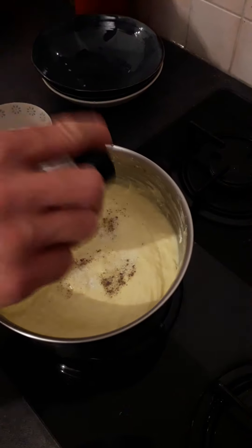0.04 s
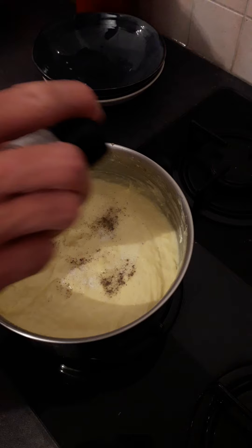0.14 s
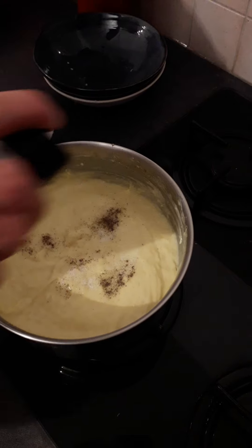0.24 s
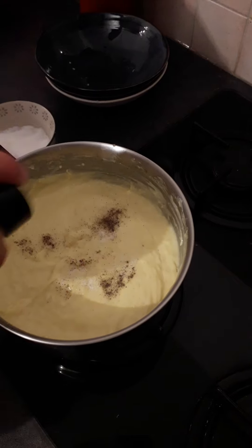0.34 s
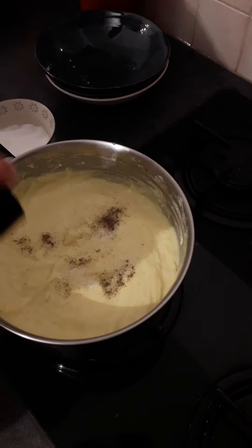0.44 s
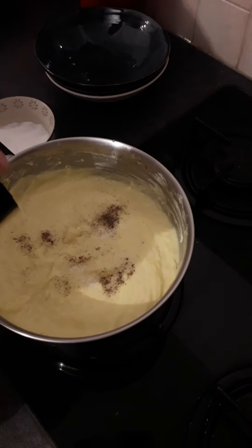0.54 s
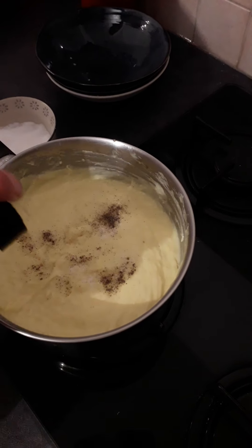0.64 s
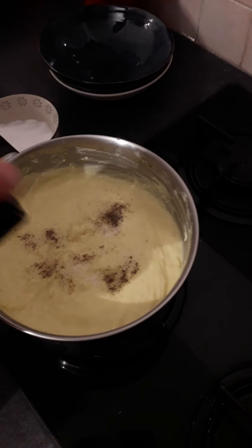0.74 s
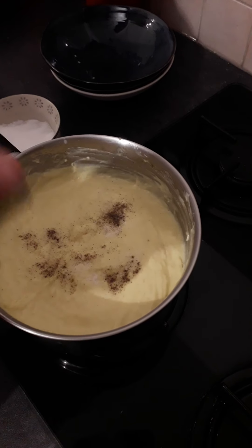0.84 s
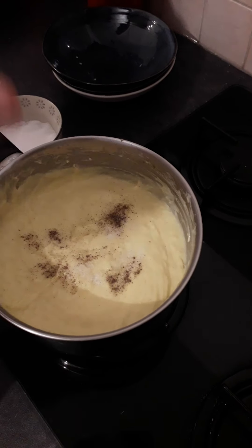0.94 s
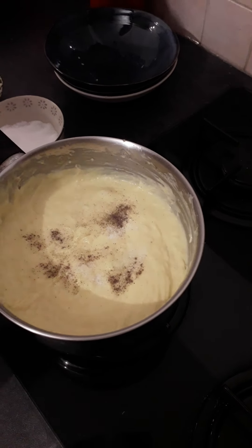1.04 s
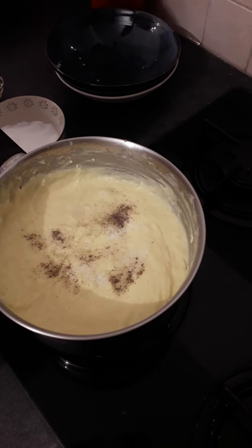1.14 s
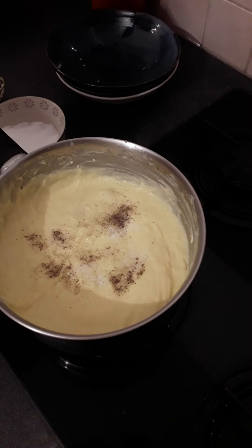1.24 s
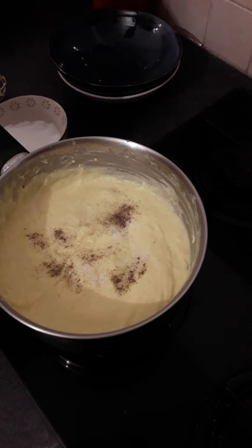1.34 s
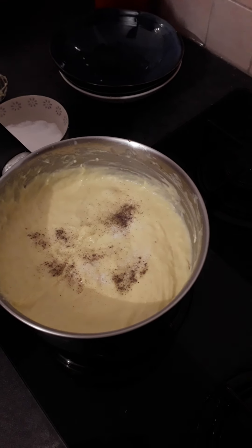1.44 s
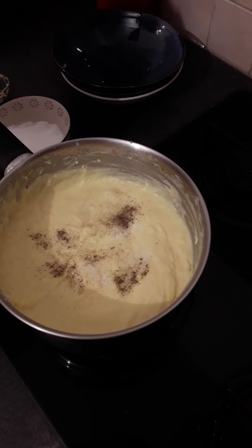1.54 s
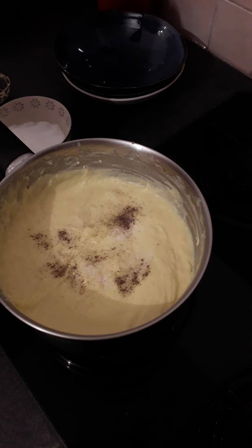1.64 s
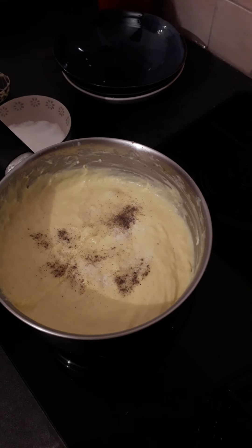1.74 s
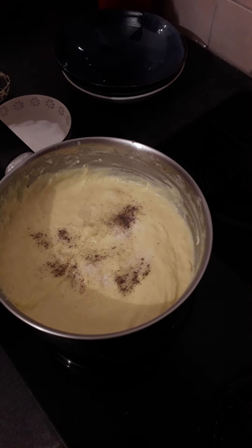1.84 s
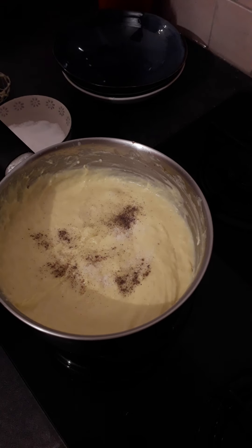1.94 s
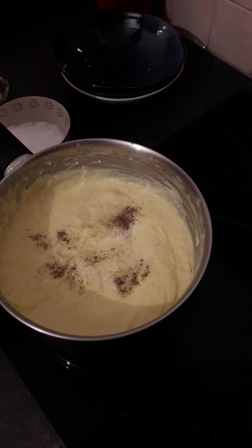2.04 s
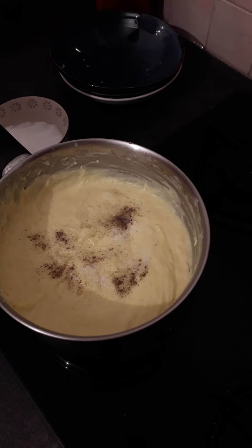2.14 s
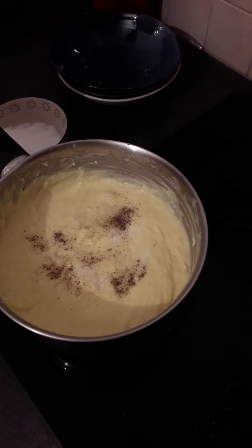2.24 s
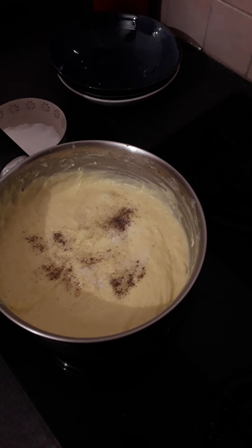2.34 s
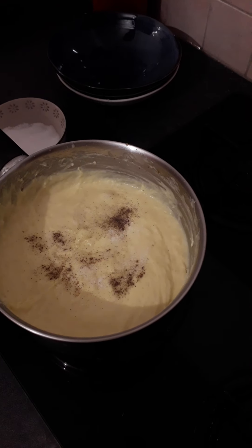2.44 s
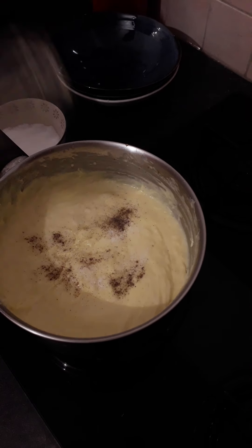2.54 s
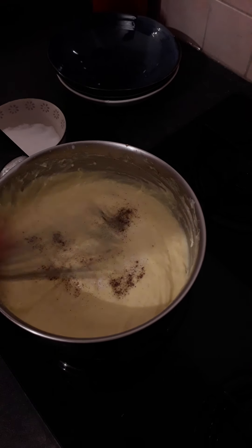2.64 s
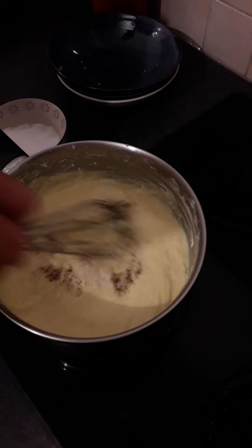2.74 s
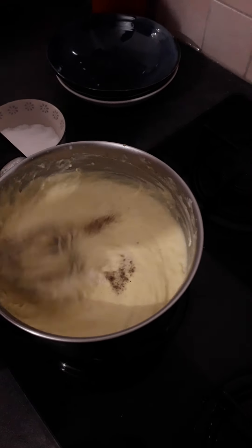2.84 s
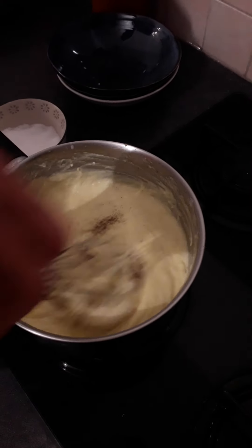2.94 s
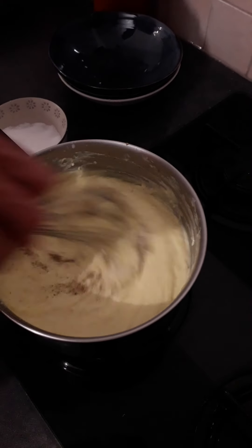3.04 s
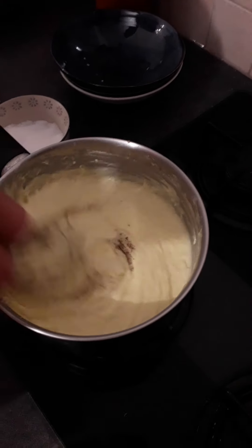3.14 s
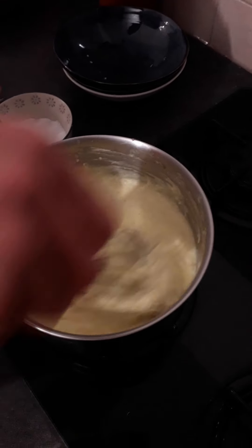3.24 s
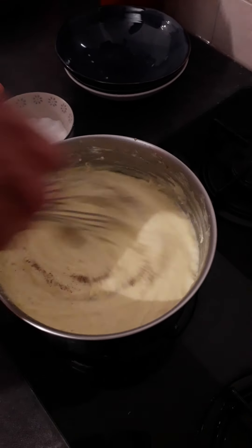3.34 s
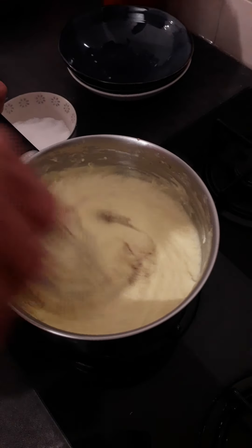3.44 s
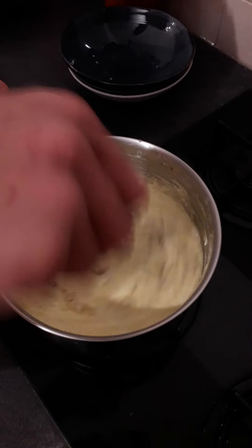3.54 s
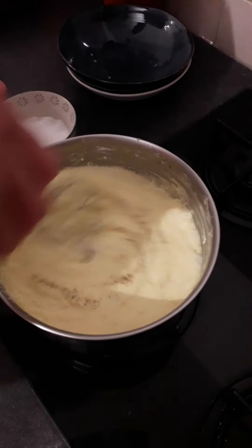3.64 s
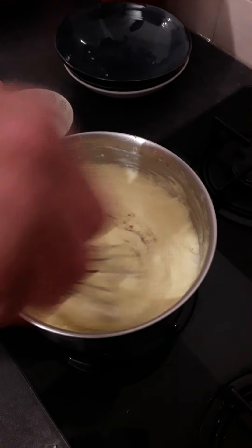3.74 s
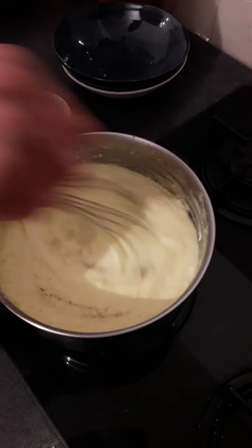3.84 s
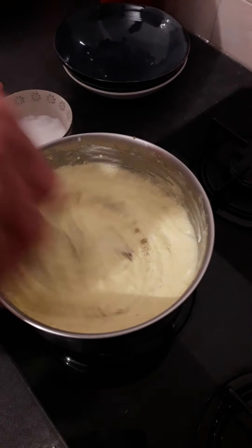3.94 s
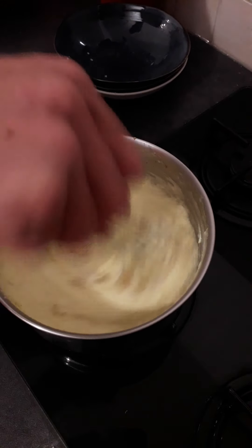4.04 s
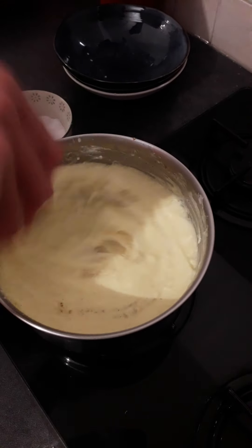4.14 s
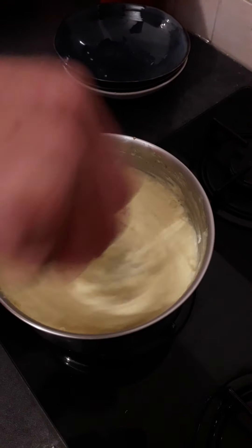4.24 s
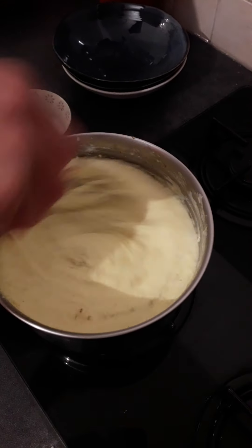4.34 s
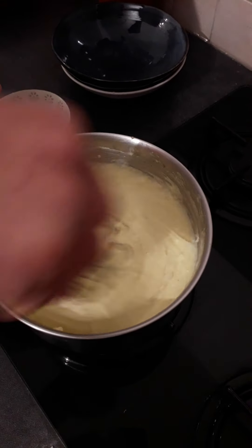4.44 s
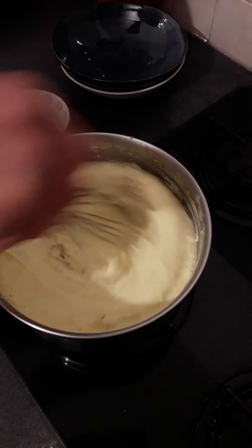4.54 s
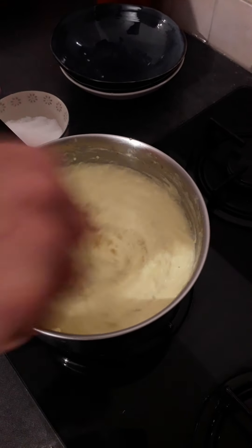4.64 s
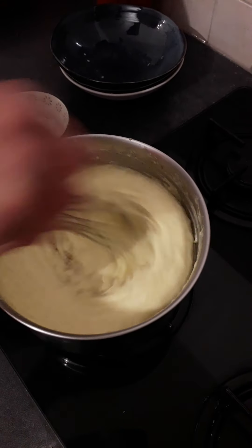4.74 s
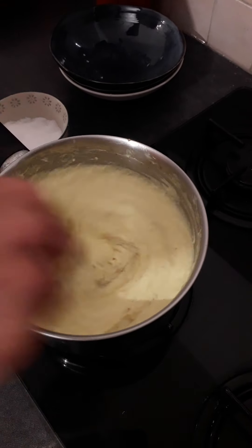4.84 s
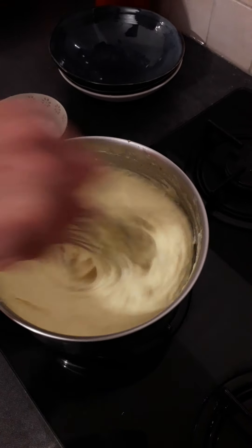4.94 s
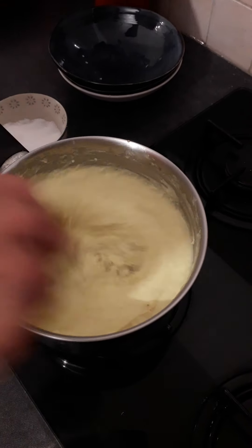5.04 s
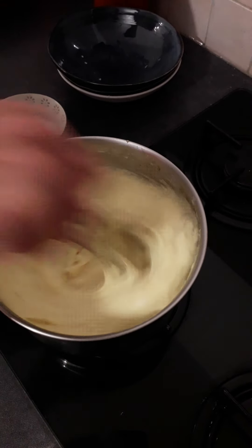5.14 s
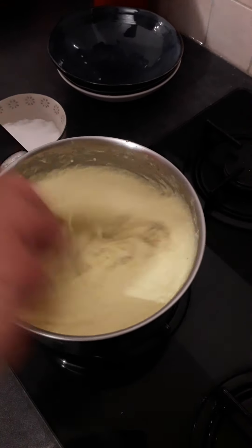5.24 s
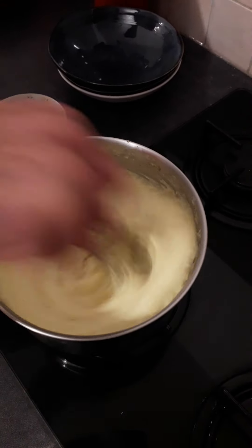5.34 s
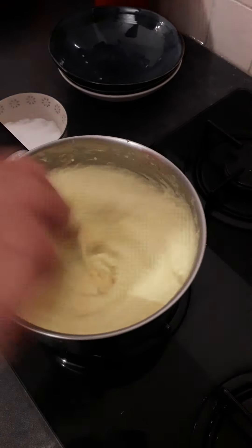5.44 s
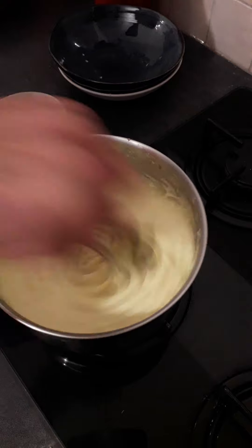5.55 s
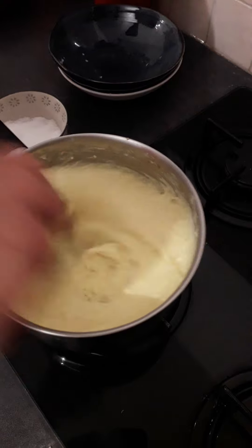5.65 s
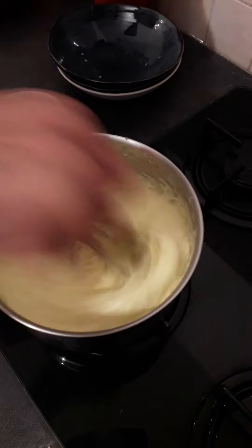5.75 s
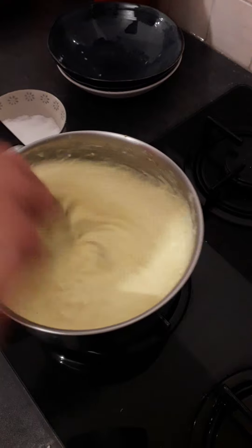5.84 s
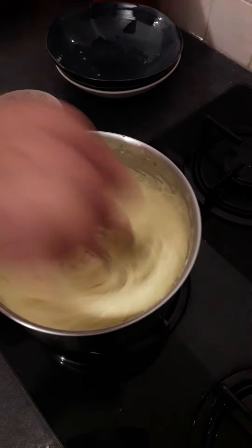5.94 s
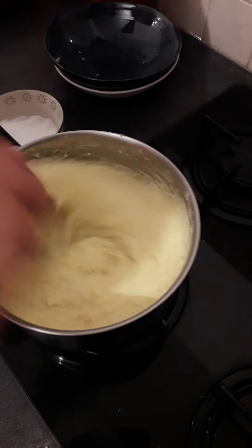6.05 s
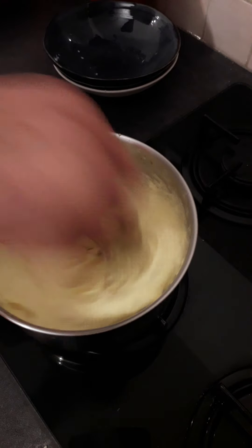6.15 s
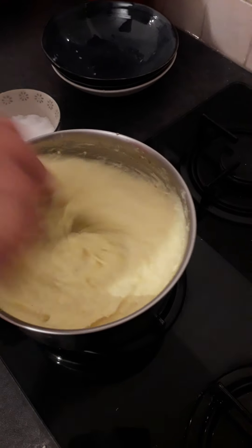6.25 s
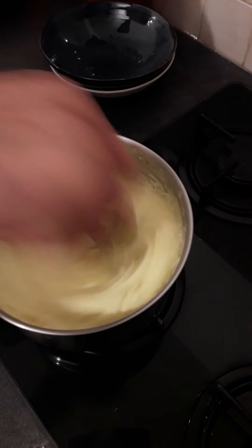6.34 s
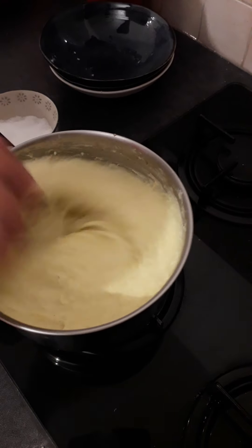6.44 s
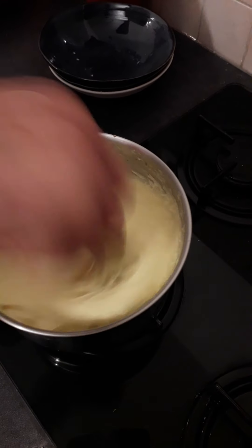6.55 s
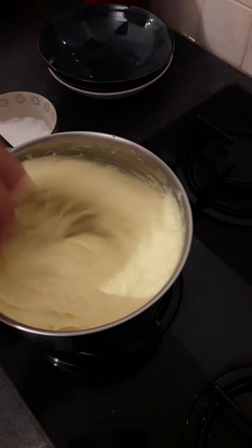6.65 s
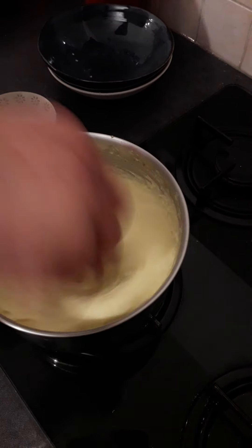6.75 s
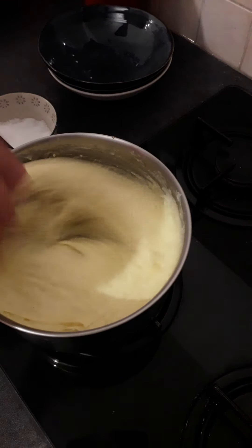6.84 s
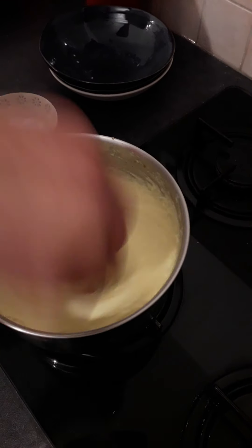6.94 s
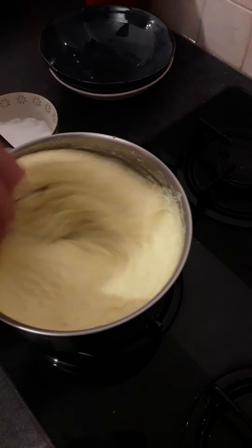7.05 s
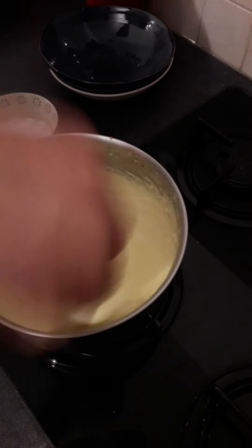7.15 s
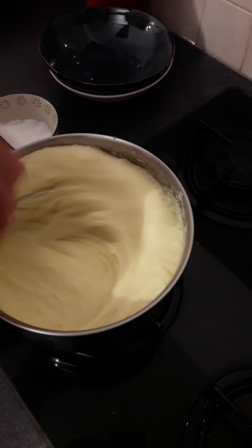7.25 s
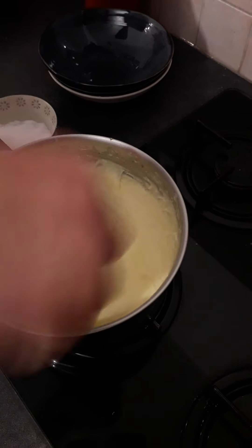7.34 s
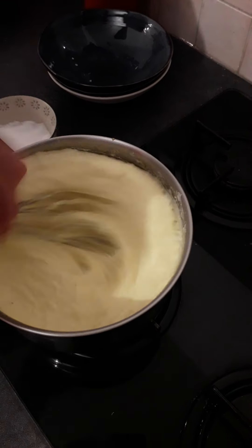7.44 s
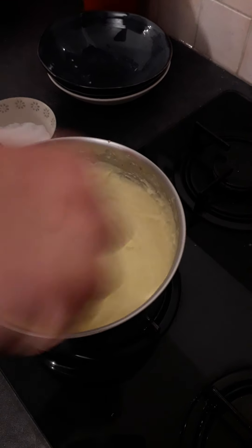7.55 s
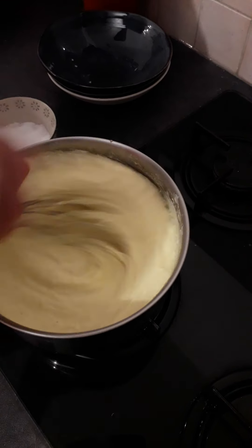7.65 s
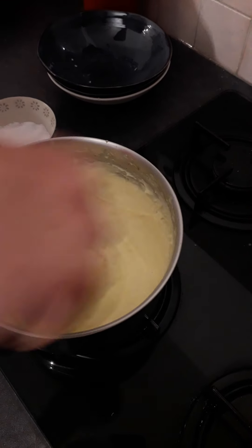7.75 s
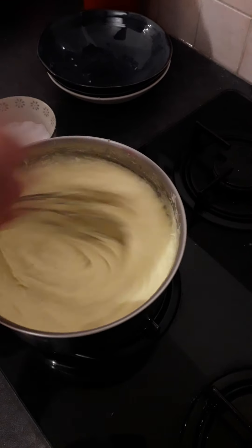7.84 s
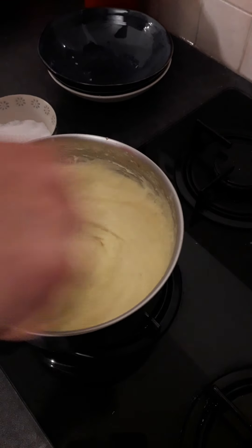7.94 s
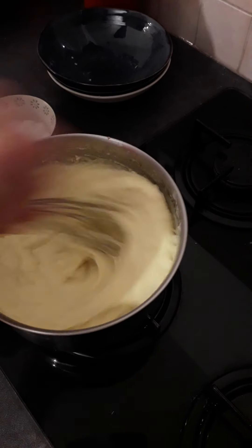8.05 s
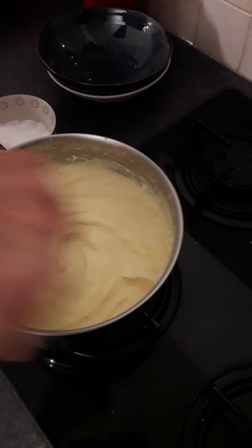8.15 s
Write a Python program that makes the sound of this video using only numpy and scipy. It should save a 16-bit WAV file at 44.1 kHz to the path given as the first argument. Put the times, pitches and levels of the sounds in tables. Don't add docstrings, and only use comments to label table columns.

```python
import sys
import numpy as np
from scipy import signal
from scipy.fft import rfft, irfft
from scipy.io import wavfile
from scipy.ndimage import uniform_filter1d

SR = 44100
rng = np.random.default_rng(int(sys.argv[2]) if len(sys.argv) > 2 else 0)


def level_to_linear(level):
    exponent = np.asarray(level, float) / 20
    return 10 ** exponent


def to_wav(sig):
    pcm = np.clip(np.atleast_2d(sig), -1, 1) * 32767
    pcm = np.round(pcm).astype(np.int16)
    wavfile.write(sys.argv[1], SR, pcm.T)


N = 361179
T = np.arange(N) / SR
CONTROL_STEP = 32

# frequency in Hz, density in dB per Hz.
AIR_SPECTRUM = [(18, -32), (30, -12), (112, -4.5), (237, -19), (292, -4.5), (415, -8), (540, -4.5),
                (779, -15.5), (1000, -20), (1300, -51.5), (2200, -120)]
# frequency in Hz, density in dB per Hz.
HISS_SPECTRUM = [(600, -24), (1200, -1), (2500, -1), (4000, 0), (7500, 2), (8300, -8), (10000, -10),
                 (11500, -3), (15800, -4)]
AIR_DB, HISS_DB = -68.5, -73
# frequency in Hz, level in dB.
HUM_LINES = [(48.4, -80), (102.3, -74), (150.7, -79.5), (199.2, -81.5), (296.1, -73), (349.9, -78),
             (543.7, -69.5), (640.6, -79.5)]
# time in seconds, low gain in dB, high gain in dB.
PHONE_GAIN = [
    (1.6, 0, 0),
    (2.2, -3, -2.5),
    (2.6, -3.5, -2.5),
    (3.1, -1.5, -.6),
    (4.0, -.6, 1.5),
]

# start in seconds, length in seconds, level in dB.
RUSTLES = [(0.838, 0.044, -59), (1.211, 0.12, -60), (1.303, 0.16, -69), (2.68, 0.054, -74.5),
           (2.941, 0.2, -73), (3.265, 0.15, -72), (3.556, 0.079, -68.5), (3.827, 0.057, -69),
           (4.045, 0.061, -64.5), (4.36, 0.023, -69), (4.43, 0.037, -64)]
# start in seconds, length in seconds, level in dB.
RESTING_WHISK = (2.67, 1.8, -72)
# frequency in Hz, density in dB per Hz.
RUSTLE_SPECTRUM = [(900, -27), (1500, -14), (2600, -12.5), (3500, -2), (5500, -3.5), (7500, 1.5),
                   (8300, -15), (9800, -20), (11500, -8), (15800, -28)]
RUSTLE_RISE_S, RUSTLE_FALL_S = .006, .02
# time in seconds, peak in dB, pitch in Hz.
TICKS = [
    (0.47, -57, 5040),
    (0.876, -52, 4930),
    (4.0804, -53, 6980),
    (4.2825, -64, 4940),
    (4.338, -52, 5700),
]
# frequency in Hz, t60 in seconds.
ROOM_T60 = [(120, 0.86), (320, 0.77), (840, 0.56), (2210, 0.57), (5820, 0.47), (10000, 0.37)]

# time in seconds, peak in dB.
LID_SNAPS = [
    (1.419, -6.5),
    (1.428, -13),
]
# frequency in Hz, level in dB.
SNAP_SPECTRUM = [(59, -52.5), (100, -27), (544, -12.5), (868, -12.5), (1030, -11.5), (3510, -0.5),
                 (4820, -11.5), (7220, -8), (8730, -27.5), (11300, -14.5), (15800, -29.5)]
# frequency in Hz, level in dB, t60 in seconds.
LID_MODES = [(1950, 0, .03), (2530, -6, .04), (2837, -5, .04), (3365, 0, .04), (3655, -3, .04),
             (4027, -4, .03), (5626, -8, .03)]
# time in seconds, peak in dB.
JAR_BLOWS = [(1.618, 2.5), (1.627, -4.5), (1.634, -1), (1.642, -3.5), (1.653, -5), (1.661, -6.5),
             (1.833, -13), (1.867, -17), (1.889, -23.5), (1.97, -28), (2.034, -35.5)]
# frequency in Hz, level in dB.
JAR_SPECTRUM = [(35, -89.5), (70, -49.5), (120, -27.5), (200, -9.5), (353, -13), (537, -6), (837, -2.5),
                (1240, -2), (2450, -22.5), (3550, -19), (7500, -33.5), (8500, -46.5), (11500, -43),
                (15800, -61)]
# frequency in Hz, level in dB, t60 in seconds.
WORKTOP_MODES = [(250, -9, .1), (350, -11, .25), (549, -6, .12), (700, -2, .07), (786, 0, .13),
                 (894, -5, .1), (1034, -3, .09), (1130, -4, .09), (1211, 0, .08), (1443, -9, .1),
                 (1820, -15, .08), (2148, -17, .1), (3149, -18, .08), (3467, -17, .1)]
# frequency in Hz, level in dB, t60 in seconds.
GLASS_MODES = [(11560, 0.5, .08), (11660, -3, 0.09), (11760, -3.5, .07), (3530, -4.5, .1), (2930, -5, .1)]
REBOUND_S, REBOUND_DULL_DB = 1.7, -6

# time in seconds, level in dB.
PLUNGE = [
    (2.88, -70.5),
    (2.904, -76),
    (2.918, -85),
    (3.004, -58),
    (3.054, -59),
    (3.084, -67),
    (3.22, -77),
]
# time in seconds, level in dB.
STIR_EFFORT = [(4.351, -32), (4.54, -71), (4.652, -48), (4.79, -52), (4.97, -44.5), (5.11, -45),
               (5.24, -49.5), (5.42, -42.5), (5.81, -46), (6.3, -48), (6.57, -49.5), (7.02, -40.5),
               (7.35, -38), (7.6, -42), (8.19, -38.5)]
# frequency in Hz, width in Hz, level in dB.
HOB_PEAKS = [(107.7, 31, 1), (153, 57, 8.5), (263, 99, -9)]
# frequency in Hz, width in Hz, level in dB.
SAUCE_PEAKS = [(354, 300, 18), (540, 71, 9.5), (730, 15, 9), (1180, 290, 10.5)]
HOB_DB, HOB_SHARE = -45, 0.11

# start in seconds, length in seconds, pitch in Hz, width in Hz, level in dB.
SINGS = [(2.93, 0.044, 2330, 119, -75.5), (2.976, 0.074, 1950, 45, -65), (2.99, 0.08, 540, 40, -57),
         (4.04, 0.021, 4950, 200, -63), (5.507, 0.03, 540, 35, -33), (5.72, 0.052, 547, 40, -42),
         (5.597, 0.013, 2100, 90, -36), (5.62, 0.038, 1850, 30, -32), (5.92, 0.076, 555, 35, -33.5),
         (6.016, 0.068, 1927, 50, -38), (6.495, 0.17, 103, 30, -39.5), (7.043, 0.08, 1920, 35, -40),
         (7.471, 0.024, 1890, 60, -31), (7.635, 0.03, 2020, 60, -40), (7.561, 0.093, 552, 50, -43),
         (7.13, 0.064, 540, 50, -43)]
AFTER_HZ, AFTER_WIDTH_HZ, AFTER_S, AFTER_DB, AFTER_GROWTH = 1620, 260, 0.07, -67, 1.1
# time in seconds, peak in dB, pitch in Hz.
THUMPS = [(2.99, -48, 512), (4.731, -32, 747), (4.939, -34, 383), (5.121, -32, 303), (5.263, -44, 385),
          (5.552, -33.5, 559), (5.659, -34, 574), (5.812, -33, 305), (6.126, -35, 577), (6.326, -29, 530),
          (6.538, -25, 540), (6.751, -27.5, 535), (6.985, -33, 606), (7.165, -32, 520), (7.201, -28, 465),
          (7.309, -36, 400), (7.368, -24.5, 525), (7.493, -36, 540), (7.599, -31, 598), (7.774, -30.5, 580),
          (7.977, -30, 550), (8.064, -22.5, 472)]
# time in seconds, peak in dB, pitch in Hz.
FLECKS = [(4.4952, -29, 5880), (4.6598, -26, 5500), (4.746, -30, 5320), (5.0796, -24, 5480),
          (5.1474, -20, 5620), (5.1994, -24, 5640), (5.2915, -16.5, 5400), (5.3573, -21, 5520),
          (5.488, -17, 5600), (5.7588, -27, 5570), (6.0766, -21, 5500), (6.183, -16.5, 4440),
          (6.2784, -21, 7100), (6.3767, -14.5, 5560), (6.395, -17, 6400), (6.5934, -19, 4960),
          (6.728, -12, 5460), (7.008, -14.5, 6290), (7.0694, -22, 6550), (7.1214, -25, 5900),
          (7.2399, -22, 5680), (7.3074, -16, 5670), (7.4165, -27, 6030), (7.4364, -25, 6350),
          (7.4594, -20, 5660), (7.511, -22, 5500), (7.625, -26, 5200), (7.64, -19, 5900),
          (7.8376, -18, 6010), (8.0303, -17, 5330)]
# time in seconds, peak in dB, pitch in Hz.
CRACKS = [
    (4.3535, -15, 5000),
    (6.4992, -12, 4600),
]

# time in seconds, peak in dB, slap of the flat loop in dB, wire tip tick in dB.
BUMPS = [(3.259, -23.5, -4.5, -7), (3.474, -32, -11.5, -17.5), (3.746, -31.5, -19, -22.5),
         (3.983, -31.5, -17, -24), (4.111, -25, -2.5, -6.5), (4.304, -31.5, 2, -41),
         (4.351, -23.5, 0.5, -1.5), (4.531, -31.5, 5.5, -12), (4.582, -20.5, 1.5, 4.5),
         (4.787, -20.5, 2, 2.5), (4.866, -21, -6.5, -0.5), (4.99, -23.5, 1, -5), (5.316, -31.5, 10, -13),
         (5.512, -29, -7, -15), (5.614, -31, 6, 2), (5.72, -28, -20, -26), (5.926, -31, -6, -15),
         (6.159, -31, 5, -2), (6.353, -25, 2.5, -9), (6.499, -20.5, -6, -5.5), (6.563, -26, -12, -20),
         (6.827, -27, -19, -14), (7.035, -29.5, 2, -17), (7.434, -26.5, -1, -12), (7.821, -27, 0, -16),
         (7.938, -26, -19, 7), (8.147, -31, -14, 7)]
# frequency in Hz, level in dB, t60 in seconds.
BASE_MODES = [(330, -7, .12), (450, 0, .06), (540, -10, .12), (770, -14, .07), (960, -15, .07)]
QUICK_S = 4.05
SLOW_BOOM_DB, QUICK_BOOM_DB = -4.5, -8.5
SLOW_UPPER_HZ, QUICK_UPPER_HZ = 143, 167.1
SLOW_UPPER_DB, QUICK_UPPER_DB = -0.5, 13.5

# time in seconds, peak in dB.
CLACKS = [(4.3075, -30.5), (4.534, -26), (4.733, -22), (4.9361, -21), (5.121, -13.5), (5.3183, -15.5),
          (5.5207, -22.5), (5.552, -23.5), (5.9502, -14.5), (6.1601, -18), (6.354, -16.5), (6.562, -13.5),
          (6.7708, -13.5), (6.983, -17), (7.201, -17), (7.3912, -18), (7.603, -24), (7.82, -18.5),
          (8.019, -20)]
# frequency in Hz, level in dB, t60 in seconds.
WALL_MODE = (1220, -17, 0.03)
CLACK_HZ, CLACK_HZ_PER_DB = 1530, 9
CLACK_TICK_DB, TICK_SPREAD_DB = -2.5, 1.5

# start in seconds, length in seconds, pressure in dB, wall ring in dB.
PUSHES = [(4.438, 0.2, -53, -4), (4.627, 0.06, -44.5, -4.5), (4.851, 0.048, -36.5, -8),
          (4.965, 0.058, -34.5, -4), (5.153, 0.072, -33, -9), (5.363, 0.068, -33, -8.5),
          (5.56, 0.077, -32, -5), (5.781, 0.053, -30.5, -7), (5.971, 0.07, -31.5, -5),
          (6.178, 0.072, -32.5, -9), (6.385, 0.068, -32, -9.5), (6.584, 0.067, -30.5, -5),
          (6.781, 0.086, -31, -8.5), (7.004, 0.066, -31.5, -5.5), (7.207, 0.081, -36, -1.5),
          (7.419, 0.063, -30.5, -2), (7.62, 0.086, -34, -1), (7.831, 0.086, -35, -7),
          (8.047, 0.067, -31.5, -6)]
# start in seconds, length in seconds, pressure in dB.
PULLS = [(4.534, 0.018, -44.5), (4.737, 0.084, -41.5), (5.067, 0.04, -33.5), (5.27, 0.052, -34.5),
         (5.48, 0.035, -34), (5.686, 0.036, -34), (5.885, 0.046, -36), (6.091, 0.042, -33),
         (6.295, 0.036, -32.5), (6.498, 0.043, -31), (6.696, 0.058, -34.5), (6.909, 0.044, -32.5),
         (7.125, 0.042, -32.5), (7.323, 0.042, -33), (7.525, 0.047, -33.5), (7.733, 0.056, -34.5),
         (7.951, 0.044, -31.5), (8.151, 0.1, -33.5)]
PUSH_HZ, PULL_HZ, STROKE_SPREAD_HZ = 5100, 6200, 850
PUSH_FIZZ_DB, PULL_FIZZ_DB, PULL_WALL_DB, DRYING_DB_PER_S = -11, -10, -14.5, -1.5
FIZZ_GROWTH = 0.28
# frequency in Hz, density in dB per Hz.
SCRAPE_SPECTRUM = [(530, -4.5), (900, -5.5), (1220, -1.5), (1500, -16), (1940, -1), (2640, -17.5),
                   (3060, 2.5), (3370, 0), (5520, 3), (7070, 4.5), (9500, -33.5), (12400, -36),
                   (20900, -120)]
# frequency in Hz, density in dB per Hz.
FIZZ_SPECTRUM = [(5000, -4), (8500, 5), (9260, -1), (11800, 9.5), (12900, -1), (15100, 2), (15800, -18.5)]
# frequency in Hz, width in Hz, level in dB.
WIRE_PEAKS = [(3150, 130, -11), (3900, 140, -9), (4650, 130, -5), (5480, 100, 2), (5750, 120, -1),
              (6300, 130, -4), (7000, 150, -2), (7700, 200, -9), (10300, 250, -18), (11400, 300, -14),
              (12300, 300, -17)]
# time in seconds, peak in dB, pitch in Hz.
ROCKS = [(4.586, -30, 173), (4.637, -28, 157), (4.796, -25, 158.3), (4.994, -25.5, 171), (5.174, -35, 103),
         (5.314, -35, 102), (5.419, -30.5, 169), (5.469, -36, 154), (5.527, -32, 169), (5.637, -29, 158),
         (5.726, -37, 187), (5.815, -31, 168), (5.909, -41, 180), (6.004, -41, 128), (6.066, -48, 124),
         (6.165, -35, 141), (6.228, -34, 143), (6.362, -34, 144.4), (6.407, -38, 154), (6.505, -30, 116),
         (6.556, -27.5, 113.5), (6.778, -30.5, 153), (6.989, -33.5, 145), (7.058, -32, 143),
         (7.206, -30, 98), (7.608, -35, 151), (7.731, -44, 152), (7.824, -37, 215), (7.948, -37, 132),
         (8.086, -32.5, 184)]


def evened(x):
    return x / np.sqrt(np.mean(x ** 2) + 1e-20)


def read(points, hz):
    f, value = np.transpose(points)
    return np.interp(np.log(hz + 1), np.log(f + 1), value)


def add(mix, start_s, sound):
    part = mix[round(start_s * SR):][:len(sound)]
    part += sound[:len(part)]


def coloured(x, points):
    gain = level_to_linear(read(points, np.fft.rfftfreq(len(x), 1 / SR)))
    return evened(irfft(rfft(x) * gain, len(x)))


def resonate(x, hz, width_hz):
    turn = np.exp(2j * np.pi * np.cumsum(hz * np.ones(len(x))) / SR)
    r = np.exp(-np.pi * width_hz / SR)
    return 2 * (turn * signal.lfilter([1 - r], [1, -r], x / turn)).real


def body(x, peaks):
    return evened(sum(level_to_linear(db) * evened(resonate(x, hz, width_hz)) for hz, width_hz, db in peaks))


def ring(modes, rise_s, size=12000):
    t = T[:size]
    x = sum(level_to_linear(db - 60 * t / t60_s) * np.sin(2 * np.pi * hz * t) for hz, db, t60_s in modes)
    x = x * (1 - np.exp(-t / rise_s))
    return x / abs(x).max()


def burst(points, t60_s, size=4096):
    z = rfft(rng.standard_normal(size) * level_to_linear(-60 * T[:size] / t60_s))
    z /= np.sqrt(uniform_filter1d(abs(z) ** 2, size=24))
    log_gain = np.log(level_to_linear(np.maximum(read(points, abs(np.fft.fftfreq(size, 1 / SR))), -100)))
    minimum_phase = np.exp(np.conj(signal.hilbert(log_gain)))
    x = irfft(z * minimum_phase[:len(z)])
    x *= signal.windows.tukey(2 * size, .5)[size:]
    return x / abs(x).max()


def slow(hz):
    lowpass = signal.butter(2, hz, fs=SR / CONTROL_STEP, output="sos")
    x = signal.sosfilt(lowpass, rng.standard_normal(N // CONTROL_STEP + 2000))
    coarse_t = T[::CONTROL_STEP]
    return np.interp(T, coarse_t, evened(x[-len(coarse_t):]))


def flicker(hz, depth_db):
    return level_to_linear(2 * depth_db * np.tanh(slow(hz) / 2))


def gritty(per_s, spread_db):
    size = level_to_linear(spread_db * np.minimum(rng.exponential(1, N), 4))
    return size * rng.standard_normal(N) * (rng.random(N) < per_s / SR)


def humps(start_s, length_s, gain, rise_s, fall_s):
    coarse_t = T[::CONTROL_STEP]
    t = coarse_t - np.asarray(start_s)[:, None]
    shape = .5 * (np.tanh(t / rise_s) - np.tanh((t - np.asarray(length_s)[:, None]) / fall_s))
    return np.interp(T, coarse_t, gain @ shape)


def air():
    low = 0
    for hz, db in HUM_LINES[1:]:
        tone = np.sin(2 * np.pi * np.cumsum(hz + 2 * slow(3.0)) / SR)
        low = low + level_to_linear(db) * tone * flicker(4.0, 1.5) * np.sqrt(2)
    mains_hz, mains_db = HUM_LINES[0]
    low += level_to_linear(mains_db + 6.5) * np.sin(2 * np.pi * mains_hz * T)
    low += level_to_linear(AIR_DB) * coloured(rng.standard_normal(N), AIR_SPECTRUM) * flicker(1.5, 1.0)
    hiss = level_to_linear(HISS_DB) * coloured(rng.standard_normal(N), HISS_SPECTRUM) * flicker(12.0, .8)
    s, low_db, high_db = np.transpose(PHONE_GAIN)
    return low * level_to_linear(np.interp(T, s, low_db)) + hiss * level_to_linear(np.interp(T, s, high_db))


def hands():
    s, length_s, db = np.transpose(RUSTLES + [RESTING_WHISK])
    gain = humps(s, length_s, level_to_linear(db), RUSTLE_RISE_S, RUSTLE_FALL_S)
    out = gain * coloured(gritty(9000, 2.5) * flicker(60, 3), RUSTLE_SPECTRUM)
    for s, db, hz in TICKS:
        tone = [(0.31 * hz, -40), (0.82 * hz, -5), (hz, 0), (1.15 * hz, -6), (1.5 * hz, -35)]
        add(out, s, level_to_linear(db + 12.5) * burst(tone, 0.02))
    tail = [(3500, -35), (4200, -3), (5000, 0), (5800, -8), (7000, -35)]
    add(out, TICKS[0][0], level_to_linear(-63) * burst(tail, .3, size=8192))
    return out


def kitchen(x):
    hz, t, z = signal.stft(rng.standard_normal(SR), SR, nperseg=256)
    decay = level_to_linear(-60 * t / read(ROOM_T60, hz)[:, None])
    tail = signal.istft(z * decay, SR, nperseg=256)[1]
    tail *= np.minimum(T[:len(tail)] / 0.011, 1)
    return signal.fftconvolve(x, tail / np.linalg.norm(tail))[:N]


def jar():
    out = np.zeros(N)
    for s, db in LID_SNAPS:
        add(out, s, level_to_linear(db - 0.5) * burst(SNAP_SPECTRUM, 0.032))
        add(out, s, level_to_linear(db - 11) * ring(LID_MODES, .0004))
    for s, db in JAR_BLOWS:
        modes = []
        for hz, level_db, t60_s in WORKTOP_MODES:
            u = rng.standard_normal()
            modes.append((hz * (1 + .012 * u), level_db + 4.0 * u, t60_s))
        thump_db = db - 1.5 + REBOUND_DULL_DB * (s > REBOUND_S)
        add(out, s, level_to_linear(thump_db) * burst(JAR_SPECTRUM, 0.045))
        add(out, s, level_to_linear(db - 8) * ring(modes, 0.00019, size=20000))
    add(out, JAR_BLOWS[0][0], level_to_linear(-33) * ring(GLASS_MODES, 0.00078))
    return out


def stirring():
    s, slosh_db = np.transpose(STIR_EFFORT)
    rumble_db = HOB_DB + HOB_SHARE * (slosh_db - slosh_db.mean())
    lumps = gritty(4000, 1.2) * flicker(12, 3)
    plunge = level_to_linear(np.interp(T, *np.transpose(PLUNGE), -140, -140))
    hob_gain = level_to_linear(np.interp(T, s, rumble_db, left=-140)) + 1.2 * plunge
    sauce_gain = level_to_linear(np.interp(T, s, slosh_db, left=-140)) + 0.7 * plunge
    low = hob_gain * body(lumps, HOB_PEAKS) + sauce_gain * body(lumps, SAUCE_PEAKS)
    return signal.sosfilt(signal.butter(2, 2500, fs=SR, output="sos"), low)


def singing():
    out = np.zeros(N)
    after = [(s + 0.0086, AFTER_S, AFTER_HZ, AFTER_WIDTH_HZ, AFTER_DB + AFTER_GROWTH * (db + 35.5))
             for s, db, _, _ in BUMPS if s < QUICK_S]
    for s, length_s, hz, width_hz, db in SINGS + after:
        tone = resonate(rng.standard_normal(16000), hz, width_hz)
        tone = evened(resonate(tone, hz, 2 * width_hz))[4000:]
        gain = humps([.03], [length_s], level_to_linear([db]), 0.0072, 0.0096)
        add(out, s - .03, gain[:len(tone)] * tone)
    return out


def catches():
    out = np.zeros(N)
    for s, db, hz in THUMPS:
        modes = [(hz, 0, .09), (0.64 * hz, -8, .05), (1.42 * hz, -9, .05)]
        add(out, s, level_to_linear(db - 3.0) * ring(modes, 0.0026, size=5000))
    for s, db, hz in FLECKS:
        tone = [(.4 * hz, -28), (.8 * hz, -10), (hz, 0), (1.2 * hz, -10), (1.8 * hz, -30)]
        add(out, s, level_to_linear(db - 4) * burst(tone, .045, size=2048))
    for s, db, hz in CRACKS:
        tone = [(300, -12), (600, -4), (1500, -10), (hz, 0), (1.4 * hz, -8), (2 * hz, -30)]
        add(out, s, level_to_linear(db) * burst(tone, .012, size=2048))
    return out


def bumps():
    out = np.zeros(N)
    base = ring(BASE_MODES, 0.004)
    thud = [(100, 0.0), (250, -4), (600, -2.5), (1000, -14.0), (3000, -47.5)]
    slap = [(600, -21.0), (1200, 9.0), (1900, 6.5), (2600, -2.5), (5000, -68)]
    click = [(1500, -20), (3000, 6.5), (5500, 6.5), (6800, -10.0), (9000, -58), (16000, -114)]
    jangle = [(1500, -2.5), (3300, 8.5), (5000, -1.5), (7000, -6), (10000, -45)]
    for s, db, slap_db, tick_db in BUMPS:
        add(out, s, level_to_linear(db - 7.0) * base)
        add(out, s, level_to_linear(db) * burst(thud, 0.15))
        add(out, s + 0.001773, level_to_linear(db + slap_db - 3.5) * burst(slap, 0.078))
        add(out, s + .0028, level_to_linear(db + tick_db + 3.5) * burst(click, .007))
        add(out, s + 0.0024, level_to_linear(db + tick_db - 12) * burst(jangle, 0.12, size=8192))
    return out


def booms():
    out = np.zeros(N)
    for s, db, _, _ in BUMPS:
        boom_db, upper_hz, upper_db = QUICK_BOOM_DB, QUICK_UPPER_HZ, QUICK_UPPER_DB
        if s < QUICK_S:
            boom_db, upper_hz, upper_db = SLOW_BOOM_DB, SLOW_UPPER_HZ, SLOW_UPPER_DB
        u, v = rng.normal(0, 1, 2)
        modes = [(99 * (1 + 0.011 * u), 0, .42), (upper_hz * (1 + 0.013 * v), upper_db + 0.58 * v, .33)]
        add(out, s, level_to_linear(db + boom_db - 3) * ring(modes, 0.007, size=20000))
    return out


def clacks():
    out = np.zeros(N)
    t = T[:400]
    window = np.sin(np.pi * np.minimum(t / 0.004, 1) ** 0.5)
    tick = [(900, 20.5), (2200, 16.5), (3700, 24.0), (4800, 18.0), (7000, 2), (10000, -30)]
    for s, db in CLACKS:
        hz = CLACK_HZ + CLACK_HZ_PER_DB * (db + 25.5)
        tick_db = CLACK_TICK_DB + 0.34 * (db + 15.5) + TICK_SPREAD_DB * rng.standard_normal()
        cycles = np.sin(2 * np.pi * 1.12 * hz * t * (1 - 22 * t))
        add(out, s - .001, level_to_linear(db - 2.2) * cycles * window)
        add(out, s, level_to_linear(db + WALL_MODE[1]) * ring([WALL_MODE], 0.012))
        add(out, s, level_to_linear(db + tick_db - 2.5) * burst(tick, 0.021))
    return out


def strokes():
    rows = [(s, length_s, db, PUSH_HZ, wall_db, PUSH_FIZZ_DB) for s, length_s, db, wall_db in PUSHES]
    rows += [(s, length_s, db, PULL_HZ, PULL_WALL_DB, PULL_FIZZ_DB) for s, length_s, db in PULLS]
    s, length_s, db, hz, wall_db, fizz_db = np.transpose(sorted(rows))
    hz = hz + STROKE_SPREAD_HZ * rng.standard_normal(len(s))
    fizz_db = fizz_db + FIZZ_GROWTH * (db + 31.5) + DRYING_DB_PER_S * (s - s.mean())
    return s, length_s, db, hz, wall_db, fizz_db


def wires():
    out = 0
    for hz, width_hz, db in WIRE_PEAKS:
        wander_hz = hz * (1 + 0.03 * slow(34.3))
        slips = rng.standard_normal(N) * flicker(36, 7.5)
        tone = resonate(resonate(slips, wander_hz, width_hz), wander_hz, 3 * width_hz)
        out = out + level_to_linear(db) * evened(tone)
    return evened(out)


def scraping():
    s, length_s, db, hz, wall_db, fizz_db = strokes()
    grit = gritty(14000, 1.5) * flicker(40, 1.2)
    bright = resonate(grit, np.interp(T, s + length_s / 2, hz), 2100)
    steel = evened(coloured(grit, SCRAPE_SPECTRUM) + 1.5 * wires() + .4 * evened(bright))
    wall = body(gritty(5000, 3.5) * flicker(21, 4.6), [(1956, 31, -5.5), (2100, 440, 4.0)])
    fizz = flicker(35, 2) * coloured(grit, FIZZ_SPECTRUM)
    contact = humps(s - .04, length_s + .08, level_to_linear(db - 17.5), .03, .04)
    swell = humps(s + 0.35 * length_s, .5 * length_s, level_to_linear(db - 0.5), 0.054, 0.016)
    press = humps(s, length_s, level_to_linear(db - 2), 0.01, 0.037)
    wall_gain = humps(s, length_s + 0.028, level_to_linear(db + wall_db - 2.0), 0.033, 0.022)
    fizz_gain = humps(s - .003, length_s + .003, level_to_linear(db + fizz_db), .009, .011) + .06 * contact
    return (press + swell + contact) * steel + wall_gain * wall + fizz_gain * fizz


def rocking():
    out = np.zeros(N)
    for s, db, hz in ROCKS:
        add(out, s, level_to_linear(db - 5.0) * ring([(hz, 0, .16)], 0.0088, size=9000))
    return out


def scene():
    far = jar()
    taps = bumps() + clacks() + hands() + catches()
    near = scraping() + singing() + stirring() + booms() + rocking()
    send = level_to_linear(-4.5) * far + level_to_linear(-7.0) * taps + level_to_linear(-13) * near
    wet = far + taps + near + kitchen(send)
    bass_cut = signal.butter(7, 88, "high", fs=SR, output="sos")
    return (signal.sosfilt(bass_cut, wet) + air())[None]


def roll_off(x):
    return signal.sosfilt(signal.butter(12, 16370, fs=SR, output="sos"), x)


def record(dry):
    band_limit = signal.cheby2(12, 45, 16200, fs=SR, output="sos")
    mix = signal.sosfiltfilt(band_limit, np.clip(dry, -.99, .99))
    return roll_off(mix)


dry = scene()
out = record(dry)
to_wav(out)
```